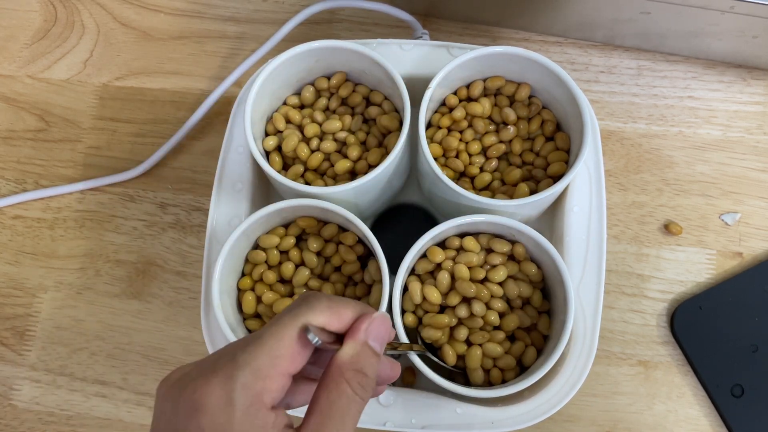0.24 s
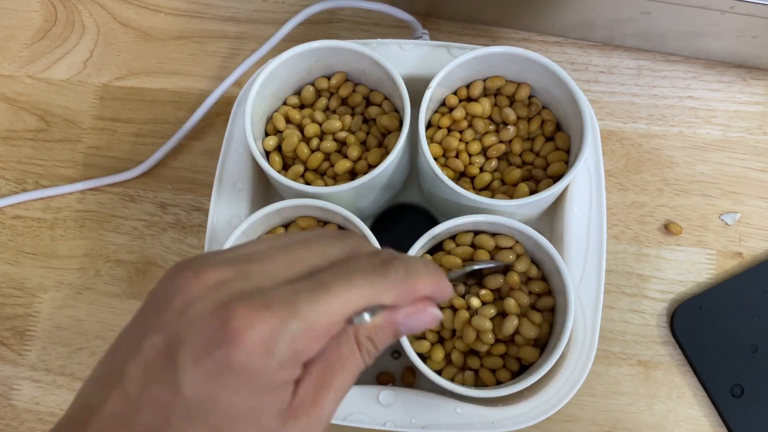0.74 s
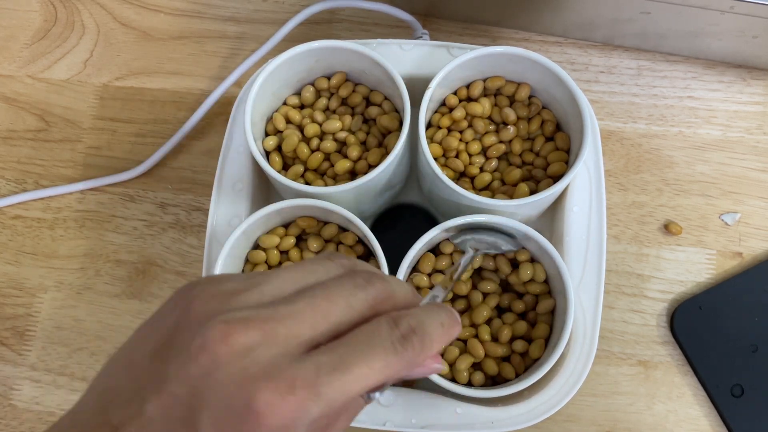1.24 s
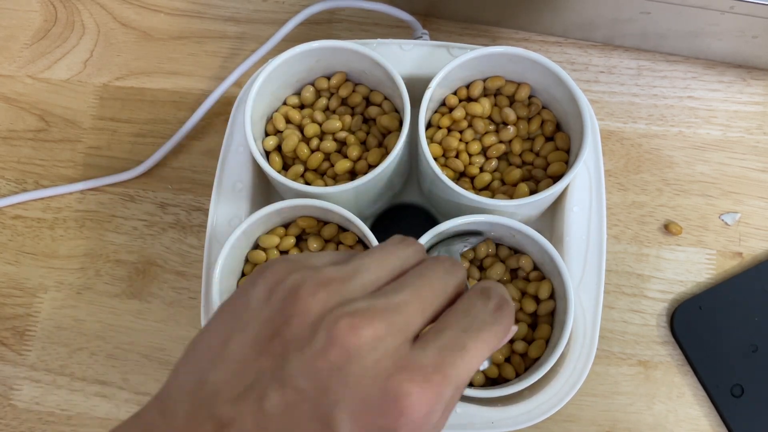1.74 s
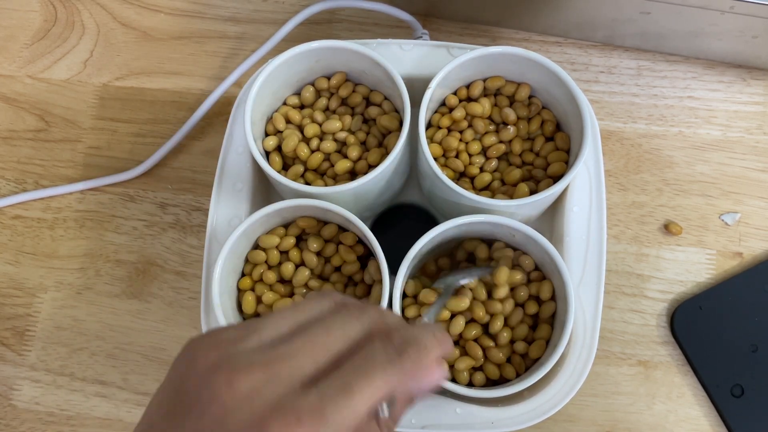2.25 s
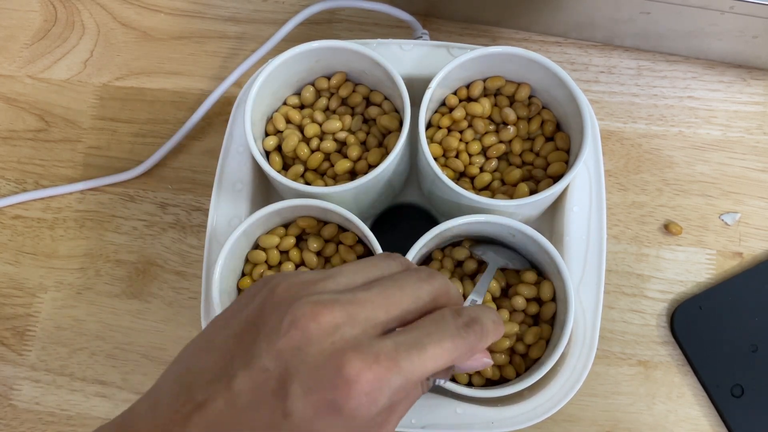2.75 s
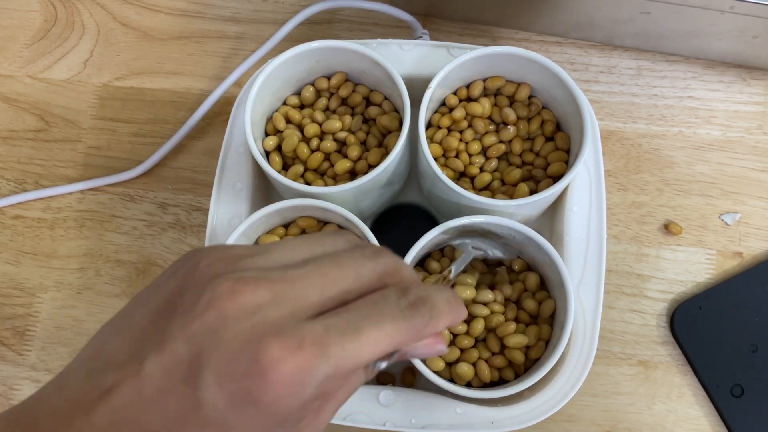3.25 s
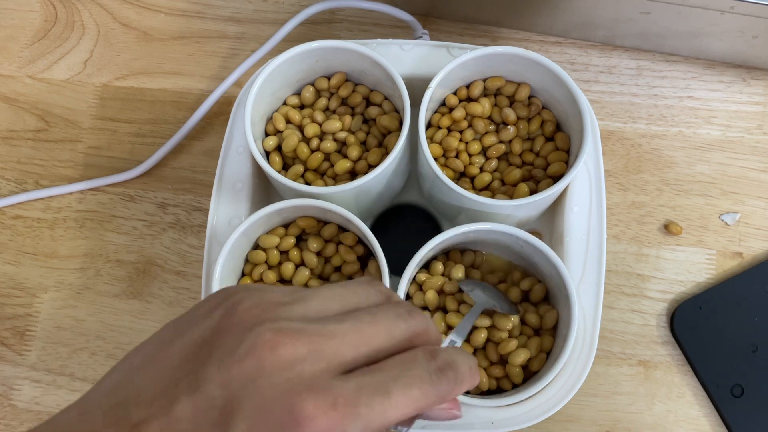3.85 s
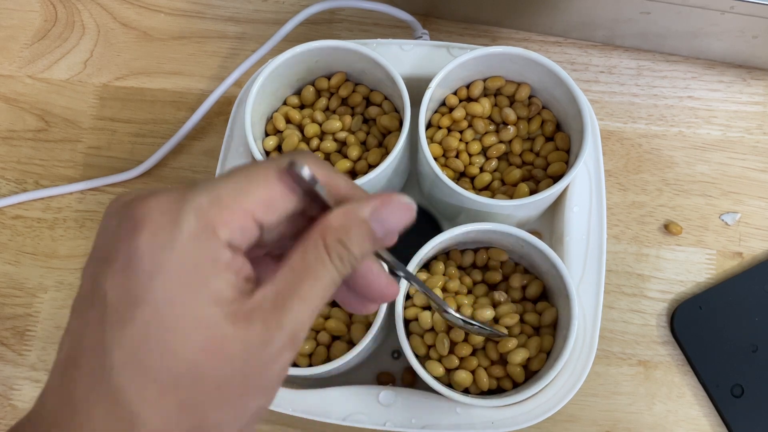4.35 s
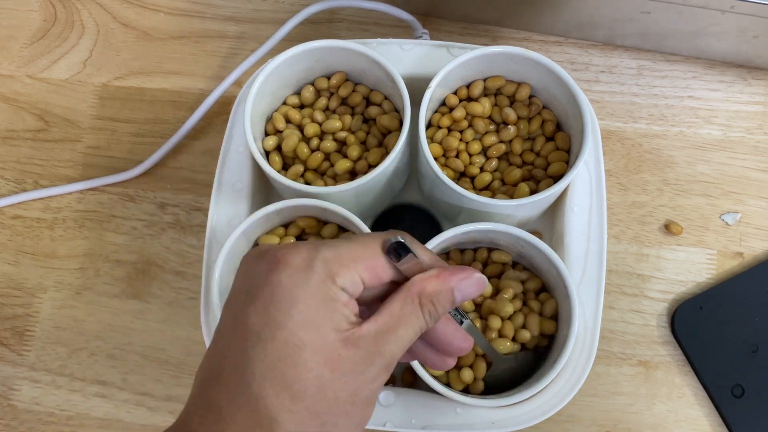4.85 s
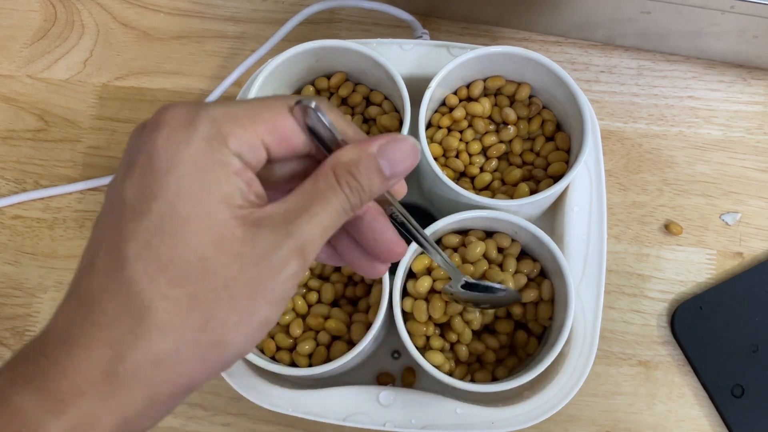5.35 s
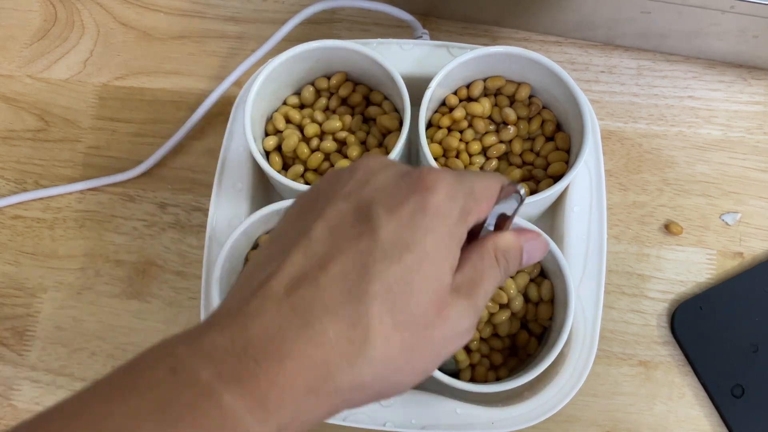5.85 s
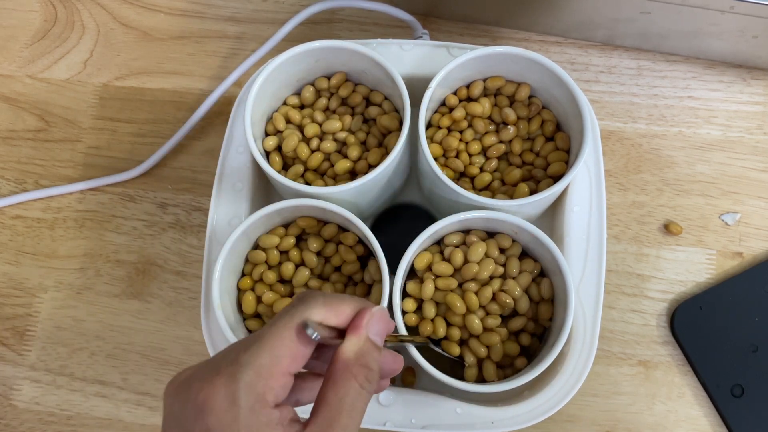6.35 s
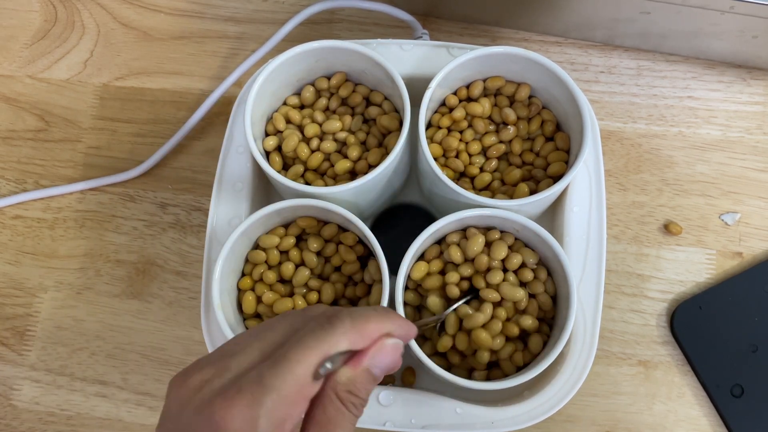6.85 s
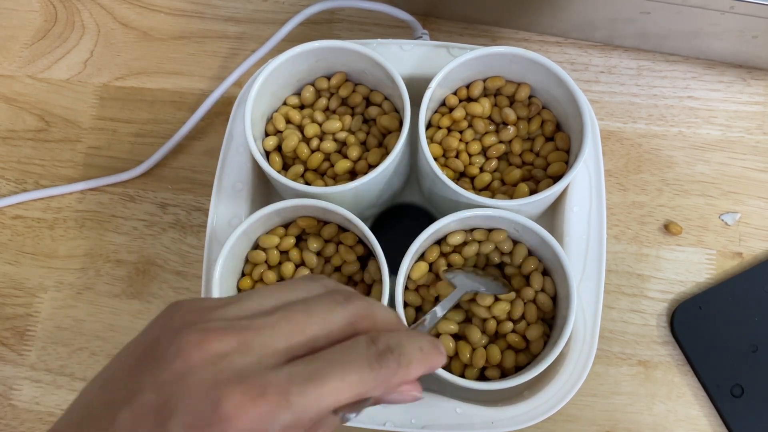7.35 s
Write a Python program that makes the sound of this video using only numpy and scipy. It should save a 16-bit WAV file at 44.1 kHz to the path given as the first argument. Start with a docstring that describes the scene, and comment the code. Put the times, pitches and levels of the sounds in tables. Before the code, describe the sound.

A metal spoon clinks irregularly against a ceramic cup of soft beans, with faint bean rustle over a low, quiet room hum.

```python
"""A steel spoon stirs soft beans in a ceramic cup that stands beside another cup on a plastic tray.
Each contact is a noise crack plus ringing modes of cup, spoon and tray in its own mix, choked by beans and fingers.
Strokes through the beans are dense faint ticks; every contact gets a kitchen tail of decaying noise.
Filtered noise makes the steady air and the wavering hum below; the shared treble differs in phase left to right."""
import sys
import numpy as np
from scipy import signal
from scipy.fft import rfft, irfft, next_fast_len
from scipy.io import wavfile
from scipy.ndimage import uniform_filter1d

SR = 44100
rng = np.random.default_rng(int(sys.argv[2]) if len(sys.argv) > 2 else 0)


def inscribe(sig):
    """Save sig as 16-bit PCM at rate SR to the path in sys.argv[1].

    A 1-D sig is mono; a 2-D sig holds one channel per row.
    Samples are clipped to [-1, 1] before scaling.
    """
    pcm = np.round(np.clip(np.atleast_2d(sig).T, -1, 1) * 32767)
    wavfile.write(sys.argv[1], SR, pcm.astype(np.int16))


N = 335160


def amp(db):
    """Gain of a level in dB."""
    return np.exp(np.asarray(db) * (np.log(10) / 20))


def unit(x):
    """Scaled to an rms of 1."""
    return x / np.sqrt(np.mean(x ** 2) + 1e-20)


def along(points, hz):
    """Value at hz of a curve of (Hz, value) points, on a log frequency axis."""
    point_hz, value = np.transpose(points)
    return np.interp(np.log(hz + 1), np.log(point_hz + 1), value)


def filtered(x, response):
    """x shaped by a response, real or complex, given as a function of frequency."""
    n = x.shape[-1]
    size = next_fast_len(n + 8192)
    spectrum = rfft(x, size) * response(np.fft.rfftfreq(size, 1 / SR))
    return irfft(spectrum, size)[..., :n]


def kitchen_air():
    """Steady stereo noise; mid and side shares set how alike the channels are at each frequency."""
    # spectrum of the air: freq_hz [Hz], density_db [dB per Hz, relative]
    air_curve = [(18, -29), (30, -16.5), (55, -1.5), (110, -1), (200, -6.5), (500, -11.5), (1000, -19.5),
                 (2000, -30), (3700, -39.5), (5000, -49.5), (7500, -54.5), (10000, -60), (12400, -63.5),
                 (13000, -74)]
    # stereo likeness: freq_hz [Hz], likeness [1 = identical channels, 0 = unrelated]
    likeness = [(60, 1), (130, 1), (290, 0.57), (640, 0.021), (1400, 0.2), (3100, 0.57), (6000, 0.93)]

    def angle(hz):
        return np.arccos(np.clip(along(likeness, hz), -1, 1)) / 2

    def mid_side(hz):
        return amp(along(air_curve, hz)) * [np.cos(angle(hz)), np.sin(angle(hz))]

    mid, side = filtered(rng.standard_normal((2, N)), mid_side)
    return amp(-50) * unit(np.array([mid + side, mid - side]))


def drones():
    """Narrow bands of noise waver like unsteady tones; the first, a low hum, also swells."""
    # hum and drones: centre_hz [Hz], width_hz [Hz from centre to 1/e], level_db [dB over the base of each]
    bands = [(53.3, 18, 4), (99, 4.9, -10.5), (218.1, 2.2, -13.5), (359.2, 3.6, -13.5), (1918, 33, -26.5)]
    # base level of the first drone: time_s [s], base_db [dB]
    swell = [(0, -67), (1.42, -67.5), (2.56, -68.5), (3.47, -51.5), (3.81, -57.5), (4.0, -54), (4.87, -51),
             (5.21, -59), (5.61, -53.5), (5.84, -54.5), (6.07, -51.5), (6.27, -57.5), (7.03, -57.5),
             (7.6, -62)]
    time_s, base_db = np.transpose(swell)
    hum_db = np.interp(np.arange(N) / SR, time_s, base_db)
    tones = []
    for centre_hz, width_hz, level_db in bands:
        band = filtered(rng.standard_normal(N), lambda f: np.exp(-((f - centre_hz) / width_hz) ** 2))
        tones.append(amp(level_db) * unit(band))
    return amp(hum_db) * tones[0] + amp(-51) * sum(tones[1:])


def kitchen():
    """Air and drones together, leaning 0.8 dB to the left."""
    return (kitchen_air() + drones()) * amp([[.4], [-.4]])


def echo(x):
    """A fresh stereo kitchen tail for one sound: noise in which each frequency dies at its own speed."""
    # kitchen reverberation: freq_hz [Hz], t60_s [s]
    room_t60 = [(200, 0.36), (1000, 0.42), (4000, 0.61), (8000, 0.59), (13000, 0.29), (16000, 0.051)]
    hz, t, noise = signal.stft(rng.standard_normal((2, len(x))), SR, nperseg=256)
    decay = amp(-60 * t / along(room_t60, hz)[:, None])
    tail = signal.istft(noise * decay, SR, nperseg=256)[1][:, :len(x)]
    late = np.pad(x, (round(.006 * SR), 0))[None]  # the room answers after 6 ms
    return signal.fftconvolve(late, tail / np.linalg.norm(tail[0]), axes=1)[:, :len(x)]


def beans():
    """Dense faint ticks of beans sliding over the steel and tumbling on each other, stroke by stroke."""
    # strokes through the beans: start_s [s], hold_s [s], slide_db [dB, on steel], tumble_db [dB]
    strokes = [(0, .02, -77, -57.5), (2.0, 0.31, -73, -75), (2.59, 0.076, -61.5, -59),
               (5.3, .35, -74.5, -78.5), (6.027, 0.15, -79, -56), (6.3, .25, -82, -80.5),
               (7.271, .02, -84.5, -82)]
    # colour of beans on steel: freq_hz [Hz], gain_db [dB]
    slide_colour = [(2500, -33), (4500, -3), (4750, 3.5), (4950, -13), (5300, 5), (5750, -0.5), (6050, -2),
                    (6400, -8), (7300, -8.5), (9500, -18), (12000, -27), (13500, -50)]
    # colour of beans on beans: freq_hz [Hz], gain_db [dB]
    tumble_colour = [(400, -30), (900, 6), (1300, -4), (1900, 3.5), (2400, -13), (3100, -18), (5000, -26.5),
                     (8000, -54)]
    swell_db_s, fade_db_s = 250, 201  # a stroke rises and dies at these rates [dB/s]

    hits = rng.random((2, 2, N)) < 4000 / SR  # 4000 ticks a second in each channel
    boost_db = [[[2.1]], [[2.6]]] * rng.exponential(size=(2, 2, N))  # a few ticks stand out
    ticks = hits * rng.standard_normal((2, 2, N)) * amp(boost_db)
    slide = unit(filtered(ticks[0], lambda f: amp(along(slide_colour, f))))
    tumble = unit(filtered(ticks[1], lambda f: amp(along(tumble_colour, f))))

    start_s, hold_s, slide_db, tumble_db = np.transpose(strokes)[:, :, None]
    t = np.arange(N) / SR
    before = np.clip(start_s - t, 0, None)
    after = np.clip(t - start_s - hold_s, 0, None)
    shape = amp(-swell_db_s * before - fade_db_s * after)
    return (amp(slide_db) * shape).sum(0) * slide + (amp(tumble_db) * shape).sum(0) * tumble


def part_levels(neck_hz, tray, hollow, handle, neck, bowl, steel, low, mid, glaze, other):
    """Level in dB of each ringing part; parts without a level of their own follow their neighbours."""
    treble = (steel + glaze) / 2
    shank_over_neck = 1 if neck_hz < 2420 else -19  # fingers stop the shank unless the neck sounds low
    return {"tray": tray, "hollow": hollow, "handle": handle, "cup low": low, "next cup": other,
            "neck": neck, "cup mid": mid, "bowl": bowl, "edge": (bowl + steel) / 2 + 4,
            "cup high": glaze, "spoon high": steel, "cup top": glaze,
            "rim": treble + .5, "tip": treble - 5.5, "shank": neck + shank_over_neck}


def crack_noise(t, crack_db, treble_db):
    """The click of contact: coloured noise with a 65 ms t60, brighter when the treble rings harder."""
    # colour of the crack: freq_hz [Hz], gain_db [dB]
    crack_colour = [(150, -23.5), (600, 5), (2000, 5), (9000, -4), (13000, -6), (16500, -13.5)]
    tilt_db = np.clip(.85 * (treble_db - crack_db + 3), -9, .6)  # dB per octave above 1500 Hz

    def colour(f):
        return amp(along(crack_colour, f) + tilt_db * np.log2(np.clip(f, 1500, None) / 1500))

    crack = unit(filtered(rng.standard_normal(len(t)), colour))
    return crack * amp(crack_db - 60 * t / .065) * (1 - np.exp(-t / .0022))


def ringing_parts(t, gap_s, push_ms, spoon_t60, cup_t60, handle_hz, neck_hz, bowl_hz, part_db):
    """Modes of cup, spoon and tray: a choked ring over a faint free ring. Returns stereo and mono sums."""
    # modes listed by part: mode_hz [Hz], mode_db [dB], share [of the choked t60],
    # free_db [dB, free ring over choked ring], free_t60 [s], lean_db [dB, left over right]
    modes = { "tray": [(258.5, -5.5, 1.6, -26, .2, -2.5), (511, -3, 0.74, -33.5, .2, 0.5),
             (360, -14, 0.52, -30, .2, 1.5), (608, -5, 0.7, -29, 0.16, 5.5)],
             "hollow": [(850, -1, .6, -34.5, 0.23, -0.5), (995, -6.5, .4, -38, .2, -1),
             (720, -12.5, .5, -35.5, .2, 2)], "handle": [(1530, 3.5, 0.37, -42.5, .3, -1),
             (1323, -12, .4, -40, .2, 1.5)], "cup low": [(1888, 2.5, 0.9, -30, 0.36, -5),
             (1950, -17, 1.1, -18, .4, -2.5)], "next cup": [(2000, -2, 0.85, -22, 0.74, 3.5)],
             "neck": [(3110, -4.5, 0.45, -45, .3, 3), (2590, -11.5, 0.27, -34.5, .25, -2.5),
             (3170, -11.5, 0.32, -34, .25, -1)], "cup mid": [(4701, -0.5, 0.55, -26.5, 0.25, -1),
             (4610, -10.5, 1.6, -30, .3, 3.5), (4800, -3.5, 1.4, -19.5, 0.24, -2.5)],
             "bowl": [(5170, -1.5, 0.69, -38.5, .3, 4.5), (5482, -10, 0.52, -31.5, .3, -0.5)],
             "edge": [(6194, -2, 0.38, -29.5, .3, 3.5), (6720, -6.5, .45, -32.5, .3, 8)],
             "cup high": [(8640, -1.5, 1.3, -22, 0.23, 0.5), (8800, -1.5, 0.79, -21.5, .3, -1.3)],
             "spoon high": [(9830, -3, 0.96, -25, 0.2, 4), (9660, -5, .8, -23, 0.39, 0.7)],
             "cup top": [(12720, -8.5, 1.1, -23, .25, -0.1), (13440, -3.5, 1.3, -13.5, .22, 1.7)],
             "rim": [(7540, 1.5, .6, -29.5, .2, 2)], "tip": [(15900, -9, .7, -27, .12, -0.2),
             (14250, -5, .8, -23, .15, 2)], "shank": [(4080, -2, 0.93, -29, .35, 2.5),
             (3720, -14, .6, -32, .3, -2.5)]}
    mode_hz, mode_db, share, free_db, free_t60, lean_db = np.concatenate(list(modes.values())).T[:, :, None]
    part = np.repeat(list(modes), [len(rows) for rows in modes.values()])
    luck = rng.standard_normal((6, len(part), 1))

    # where the next cup outrings the stirred one, its hollow and its place are heard
    across = 1 / (1 + amp(2 * (part_db["cup low"] - part_db["next cup"])))
    hollow_hz = 810.5 + across * (1000 - 810.5)  # air space over the beans
    pan_db = 2.2 + across * (-1 - 2.2)  # left over right

    # these parts shift in pitch with the grip and depth of each contact
    held_hz = {"hollow": hollow_hz, "handle": handle_hz, "neck": neck_hz, "bowl": bowl_hz,
               "shank": 2.62 * handle_hz}  # pitch ratio of two bending modes of the spoon
    first_hz = {name: rows[0][0] for name, rows in modes.items()}
    shift = [[held_hz.get(p, first_hz[p]) / first_hz[p]] for p in part]
    pitch_hz = mode_hz * shift
    level_db = np.array([[part_db[p]] for p in part]) + mode_db - .6 + 1.2 * luck[0]

    # the push lasts a moment: low modes build up more slowly
    push_s = np.clip(push_ms, .2, 5) / 1000 * (3000 / pitch_hz) ** .12
    rise = 1 - np.exp(-(t[:SR // 50] / push_s) ** 2)

    # beans and fingers choke each part
    body = np.isin(part, ("tray", "hollow", "handle"))
    low_cups = np.isin(part, ("cup low", "next cup"))
    choke_s = np.select([body, low_cups], [.05, np.clip(cup_t60, .02, .3)], np.clip(spoon_t60, .012, .1))
    t60 = share * choke_s[:, None]
    early = t[:round(SR * (t60.max() + .01))]
    # decay starts when the spoon lets go; its next touch damps what still rings
    decay_db = -60 * np.clip(early - 1.88 * push_s, 0, None) / t60
    fade = amp(decay_db - 18 * np.clip((early - gap_s) / .008, 0, 1))

    # the free ring has a wandering phase: a little in the steady parts, much in the others
    steady = np.isin(part, ("cup low", "next cup", "cup mid", "cup high", "cup top", "shank"))[:, None]
    steps = np.where(steady, .08, .45) * rng.standard_normal((len(part), len(t) // 64 + 1))
    wander = np.repeat(np.cumsum(steps, axis=1), 64, axis=1)[:, :len(t)]
    turn = 2 * np.pi * pitch_hz * t
    free = amp(free_db - 60 * t / free_t60) * np.sin(turn + uniform_filter1d(wander, size=64) + 3 * luck[1])
    # no wall is quite round: each mode is a close pair that beats
    beat = .83 + .65 * np.cos(2 * np.pi * (11 + 4 * luck[4]) * t[::8] + 3 * luck[5])
    ring = free * np.repeat(beat, 8, axis=1)[:, :len(t)]

    ring[:, :len(early)] += fade * np.sin(turn[:, :len(early)] + 3 * luck[2])
    ring[:, :SR // 50] *= rise
    ring *= amp(level_db) * np.clip((t[-1] - t) / .08, 0, 1)  # 80 ms closing fade
    # each mode radiates its own way, so its left-right balance differs
    lean = amp((pan_db + lean_db + .76 * luck[3]) / 2)
    return np.array([(ring * lean).sum(0), (ring / lean).sum(0)]), ring.sum(0)


def contacts():
    """Every touch of the spoon: a crack, ringing parts and the answer of the kitchen."""
    # contacts: start_s [s], push_ms [ms], spoon_t60 [s], cup_t60 [s], handle_hz, neck_hz, bowl_hz [Hz],
    # crack_db [dB], then how hard each is rung [dB]: tray, hollow, handle, neck, bowl, treble of the
    # spoon, cup low, cup mid, treble of the cup, next cup
    touches = [(0.0432, 1.6, .024, 0.037, 1536, 2300, 5040, -36.5, -36, -28.5, -26, -25, -31, -55.5, -29.5, -28, -38.5, -57),
               (1.2261, 0.52, 0.026, 0.14, 1250, 2920, 5240, -37.5, -56, -39, -31, -42, -34, -51.5, -30.5, -37.5, -50, -46),
               (1.5993, 2.3, 0.022, 0.025, 1560, 3220, 4860, -35.5, -59, -33.5, -36.5, -36, -26, -35.5, -18.5, -23.5, -43, -29),
               (1.778, .77, 0.016, 0.042, 1250, 2440, 5460, -57, -55, -41.5, -70, -79, -61, -82, -49.5, -62, -74, -60),
               (1.7947, 1.7, .018, .03, 1530, 2270, 5000, -51.5, -44, -40.5, -55, -69, -72, -79, -56, -69, -82, -72),
               (2.0173, 1.97, 0.02, 0.059, 1620, 3250, 5230, -50, -60, -64, -54, -34, -46, -57.5, -39.5, -44, -64, -44),
               (2.533, 0.22, 0.051, .17, 1314, 2660, 5560, -35, -37, -34, -26, -39.5, -37, -56, -42, -34, -46.5, -52),
               (2.876, .51, .03, 0.073, 1570, 2540, 4890, -48.5, -38.5, -35, -42, -42, -75, -92, -53.5, -53, -85, -42),
               (3.2672, 1.73, 0.024, 0.047, 1340, 2680, 4950, -33.5, -52, -32, -41, -42, -23, -37, -19, -25.5, -44, -33),
               (3.4239, 1.2, .03, 0.069, 1310, 2310, 5030, -58.5, -48.5, -39, -50, -62, -58, -80, -51, -53, -75, -53),
               (3.462, 1.4, 0.06, 0.18, 1610, 3300, 5750, -58, -44, -31, -59.5, -63, -53, -62, -48, -46.5, -66, -64.5),
               (3.496, .9, .033, .069, 1440, 2420, 5130, -37.5, -31.5, -30.5, -34.5, -30, -24, -36, -63.5, -39, -40, -75.5),
               (3.5331, .9, 0.054, 0.2, 1630, 2490, 5000, -47.5, -36, -28.5, -49, -62, -57, -65, -64, -61, -70, -61),
               (3.663, 1.4, 0.0094, 0.08, 1518, 2400, 5290, -30, -18.5, -19.5, -29.5, -31, -36.5, -48, -39, -39, -52, -42),
               (3.6994, .6, .03, .03, 1390, 2200, 5630, -57, -33, -50, -54, -62, -69, -84, -66, -65, -84, -72),
               (4.5934, 1.44, 0.042, 0.33, 1586, 2460, 5250, -31, -45.5, -33.5, -34, -36, -28, -34, -39, -17.5, -31, -46.5),
               (4.946, 1.1, 0.054, .1, 1540, 2900, 5140, -17, -23.5, -9.5, -18.5, -14.5, -20, -59.5, -23.5, -9.5, -31, -13.5),
               (5.5516, .9, 0.077, 0.062, 1260, 3240, 5600, -29, -44.5, -35.5, -44.5, -33, -40, -27.5, -21, -19.5, -31.5, -30),
               (5.6435, .39, .03, 0.022, 1670, 2400, 5110, -63, -46.5, -44, -33.5, -58, -42, -72.5, -39.5, -48, -68.5, -51),
               (5.8519, 1.42, 0.013, 0.15, 1240, 2920, 4860, -36.5, -25.5, -23, -30.5, -29.5, -38, -44.5, -34.5, -30.5, -41.5, -60),
               (6.1596, 1.9, .031, 0.031, 1590, 2360, 5100, -42, -41, -29.5, -35, -45.5, -46.5, -69.5, -39.5, -46, -77, -39.5),
               (6.2105, 1.2, .019, 0.043, 1514, 2350, 5100, -45.5, -48, -44, -39, -42, -37, -58.5, -38.5, -38, -58.5, -39),
               (6.3531, .89, .027, 0.23, 1190, 3020, 5736, -34, -29.5, -25, -31, -57, -21, -45.5, -21, -22.5, -36.5, -35),
               (6.402, .6, .03, .02, 1620, 2200, 5090, -85.5, -50, -35.5, -43, -68, -63, -76.5, -42.5, -63.5, -69, -41.5),
               (6.4804, 1.2, 0.028, 0.018, 1640, 2190, 5700, -66, -47, -43.5, -44.5, -59, -57, -73, -47, -53, -82, -45),
               (6.612, 1.7, 0.037, .06, 1390, 2340, 5110, -71, -57, -45, -71, -72, -61, -84, -53.5, -63, -77.5, -58),
               (6.7222, .93, .018, .03, 1205, 2350, 5100, -62.5, -43.5, -40, -51.5, -74, -65, -106, -59, -69.5, -88, -67)]
    out = np.zeros((2, N + SR))
    gaps_s = np.diff([row[0] for row in touches], append=N / SR)
    for gap_s, touch in zip(gaps_s, touches):
        start_s, push_ms, spoon_t60, cup_t60, handle_hz, neck_hz, bowl_hz, crack_db, *rung_db = touch
        part_db = part_levels(neck_hz, *rung_db)
        length_s = np.clip(.74 + crack_db / 90, .14, .5)  # a harder crack gets a longer sound
        t = np.arange(round(SR * length_s)) / SR
        rings, mono = ringing_parts(t, gap_s, push_ms, spoon_t60, cup_t60,
                                    handle_hz, neck_hz, bowl_hz, part_db)
        crack = crack_noise(t, crack_db, max(part_db["spoon high"], part_db["cup top"]))
        room = echo(amp(-15) * mono + amp(-10) * crack)
        out[:, round(start_s * SR):][:, :len(t)] += rings + crack + room
    return out[:, :N]


def scene():
    """Spoon contacts, beans and kitchen together."""
    return contacts() + beans() + kitchen()


def record(dry):
    """Round off the hardest peaks, share the left treble with phase offsets, and cut above the band limit."""
    # phase of left before right: freq_hz [Hz], lead_rad [rad]
    lead = [(0, 0.25), (1000, 0.2), (2000, 0.21), (3000, 0.89), (5000, .5), (5700, -1.07), (6500, -1.1),
            (7100, -1.6), (8000, -3.5), (9800, -4.5), (12700, -7.5), (14800, -10), (16800, -10)]
    mono_hz, top_hz = 6000, 16900  # one shared signal above the first, silence above the second

    def treble(hz):
        return 1 / (1 + (mono_hz / (hz + 1)) ** 16)

    def phase_and_limit(hz):
        half_lead = np.interp(hz, *np.transpose(lead)) / 2
        return (hz < top_hz) * np.exp(1j * np.outer([1, -1], half_lead))

    rounded = dry / (1 + abs(dry / .85) ** 4) ** (1 / 4)
    shared = rounded + filtered(rounded[0] - rounded, treble)
    return filtered(shared, phase_and_limit)


dry = scene()
out = record(dry)
inscribe(out)
```